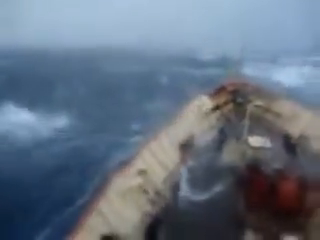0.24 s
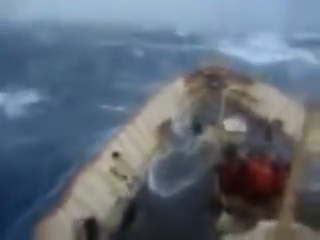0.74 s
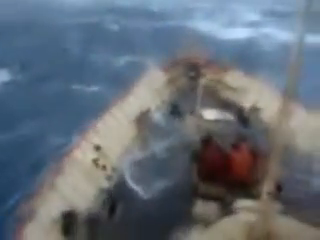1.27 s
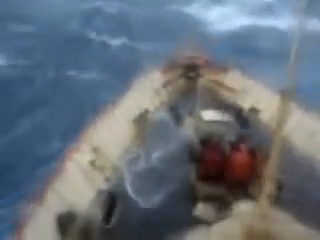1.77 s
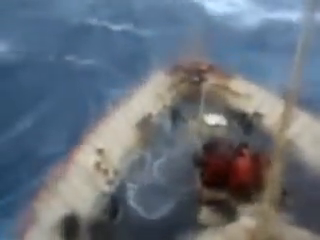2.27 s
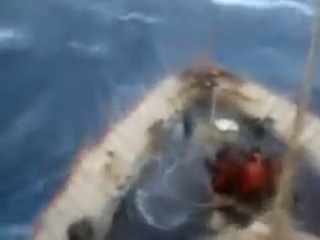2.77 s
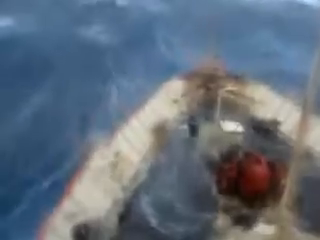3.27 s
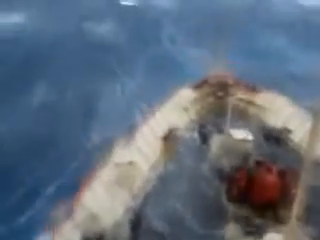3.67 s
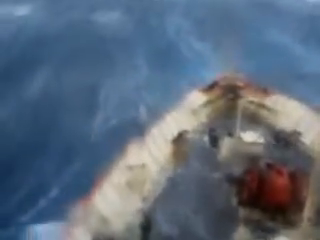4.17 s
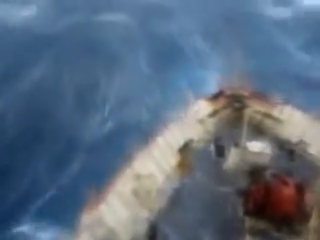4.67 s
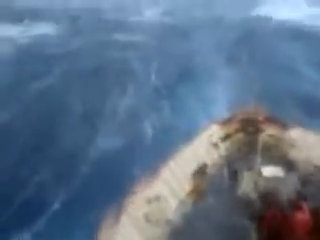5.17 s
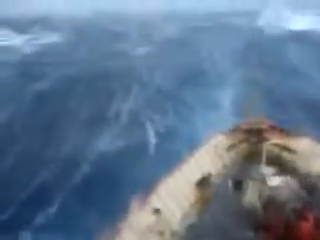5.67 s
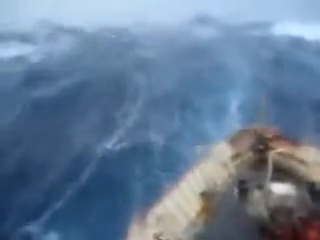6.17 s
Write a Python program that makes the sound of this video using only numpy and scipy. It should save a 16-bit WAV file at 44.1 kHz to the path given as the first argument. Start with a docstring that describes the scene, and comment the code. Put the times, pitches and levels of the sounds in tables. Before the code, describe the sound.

A deep, uneven engine throb fills a ship's bridge, with panels and light fittings buzzing in wavering tones. Outside, wind and sea rush continuously, with a faint airy whistle in gaps. Spray and sharp window drops come early, the weather softens in the middle around a swelling deck hum, then the hiss and roar rise again with isolated drops. The microphone is inside, close to the vibrating structure, in mono.

```python
"""On the bridge of a ship that pitches through a storm: two engines drone, sea and wind roar, plating buzzes.
0-1.7 s: the faster engine leads; roar and spray hiss (filtered noise) run high, drops (noise bursts through
pane resonances) smack the window, water surges over steel. 1.7-3.8 s: the faster engine sinks, the slower
comes forward, the sea ebbs, the deck hum swells at 2.63 s. From 3.8 s: faster engine, sea and spray return,
with single drops; the slower engine fades out. The engines and structure are wavering sines that beat."""
import sys
import numpy as np
from scipy import signal
from scipy.fft import rfft, irfft, next_fast_len
from scipy.io import wavfile
from scipy.ndimage import uniform_filter1d, map_coordinates

SR = 44100
rng = np.random.default_rng(int(sys.argv[2]) if len(sys.argv) > 2 else 0)


def master_out(mix):
    """Clip the mix to full scale and print it as 16-bit PCM to the path in sys.argv[1]."""
    frames = np.transpose(np.atleast_2d(mix))
    ceiling = np.clip(frames, -1, 1)
    pcm = np.round(ceiling * 32767).astype(np.int16)
    wavfile.write(sys.argv[1], SR, pcm)


N = 284004

# weather before trims: t/s, sea roar/dB, spray/dB
STORM = [(0.0, -25.5, -45.5), (0.28, -26, -36), (0.82, -25, -36), (0.92, -25.5, -37.5), (1.28, -24, -42),
         (1.56, -25.0, -38.5), (1.92, -27.5, -42.5), (2.16, -26.5, -43.5), (2.36, -29, -45.5),
         (3.16, -30, -47), (3.4, -32, -39), (4.14, -26.5, -35.5), (4.78, -26.5, -37), (5.02, -28.5, -39.5),
         (5.48, -25.5, -35.5), (6.42, -28.5, -40.5)]
# spray spectrum, relative: f/Hz, density/dB
SPRAY = [(1500, -23), (3200, -4.5), (4000, 0.5), (4500, 1.5), (5400, -3), (6500, -8), (8000, -4),
         (9500, -6), (10500, -20.5)]


def amp(db):
    """Decibels to gain."""
    return 10 ** (np.asarray(db) / 20)


def unit(x):
    """x at rms 1."""
    return x / np.sqrt(np.mean(x ** 2) + 1e-20)


def swing(db):
    """A level curve about its mean."""
    return db - db.mean()


def curves(rows):
    """One value per sample for each column after the time."""
    s, *cols = np.transpose(rows)
    return [np.interp(np.arange(N) / SR, s, c) for c in cols]


def wobble(rate):
    """A smooth random curve, rate knots a second."""
    knots = rng.standard_normal(1024)
    return map_coordinates(knots, [np.arange(N) * rate / SR], mode="mirror")


def filtered(x, response):
    """x times a response of frequency."""
    m = next_fast_len(len(x) + 8192)
    spectrum = rfft(x, m) * response(np.fft.rfftfreq(m, 1 / SR))
    return irfft(spectrum, m)[:len(x)]


def ring(hz, centre_hz, width_hz):
    """Response of one resonance."""
    return 1j * hz * width_hz / (centre_hz ** 2 - hz ** 2 + 1j * hz * width_hz)


def rush(spectrum, patchy_db):
    """Coloured noise of rms 1 with turbulent patches of random gain."""
    z = signal.stft(rng.standard_normal(N), nperseg=512)[2]
    field = uniform_filter1d(rng.standard_normal(z.shape), size=9, axis=0)  # over frequency
    field = uniform_filter1d(field, size=10, axis=1)  # over time
    noise = signal.istft(z * amp(patchy_db * unit(field)), nperseg=512)[1][:N]
    f, db = np.transpose(spectrum)
    return unit(filtered(noise, lambda hz: amp(np.interp(np.log(hz + 1), np.log(f), db))))


def tone(hz, drift_rad, rate, flutter_db):
    """A sine of rms 1; independent wobbles of rate knots/s, scaled by drift and flutter, move phase and level."""
    phase = 2 * np.pi * (hz * np.arange(N) / SR + rng.random()) + drift_rad * wobble(rate)
    return unit(np.sin(phase) * amp(flutter_db * wobble(rate)))


def engine_room():
    """Pumps and fans hum, the higher tones wavering faster, over a dull rumble that grows with the sea."""
    # steady machinery tones: f/Hz, level/dB
    machinery = [(71.6, -36.5), (80.9, -43), (92.1, -37.5), (95.5, -36.5), (131.6, -35), (166, -40.5),
                 (330, -43.5), (548, -46.5), (763, -45)]
    # hull rumble spectrum, relative: f/Hz, density/dB
    rumble_spectrum = [(20, -15), (45, -11), (62, -5), (90, -0.5), (135, 1.5), (175, -5), (230, -1.5),
                       (320, -15.5), (500, -17), (1000, -61.5)]
    base_db, db_per_sea_db = -26, 0.38
    roar_db, _ = curves(STORM)
    hum = sum(amp(db) * tone(hz, drift_rad=0.69, rate=4 + hz / 45, flutter_db=4) for hz, db in machinery)
    rumble_db = base_db + db_per_sea_db * swing(roar_db) + 0.99 * wobble(6)
    return hum + amp(rumble_db) * rush(rumble_spectrum, patchy_db=0.1)


def storm():
    """Turbulent noise: sea roar, spray hiss, wind that rises with both, and gaps whistling as resonances."""
    # sea roar spectrum, relative: f/Hz, density/dB
    roar_spectrum = [(100, -9.5), (220, 2), (380, 0.5), (460, -1), (570, -0.5), (680, -7), (950, -6),
                     (1150, -15), (1800, -26), (4000, -60.5)]
    # wind spectrum, relative: f/Hz, density/dB
    wind_spectrum = [(500, -22), (1000, 1.5), (1500, 0), (1900, -3.5), (2600, -5.5), (3300, -13.5),
                     (5000, -11.5), (10000, -21.5)]
    # gap resonances the wind sings in: f/Hz, width/Hz, relative level/dB
    gap_modes = [(2007, 24, 1.5), (2560, 58, -10), (4052, 40, -5), (4390, 110, -0.5), (7590, 64, -9)]
    roar_trim_db, spray_trim_db, gap_trim_db = 2.5, -0.5, -14
    wind_base_db, wind_db_per_sea_db, wind_db_per_spray_db = -38, 0.7, 0.27
    mist_hz, mist_lag_s = 5800, 0.087

    roar_db, spray_db = curves(STORM)
    wind_db = wind_base_db + wind_db_per_sea_db * swing(roar_db) + wind_db_per_spray_db * swing(spray_db)
    gust = wobble(22)
    roar = amp(roar_db + roar_trim_db + 0.72 * wobble(16)) * rush(roar_spectrum, patchy_db=0.75)
    wind = amp(wind_db + 0.85 * gust) * rush(wind_spectrum, patchy_db=1.2)

    # finest spray: builds up later, falls without lag
    t = np.arange(N) / SR
    lagged_db = np.interp(t - mist_lag_s, t, spray_db)
    mist_db = np.minimum(spray_db, (spray_db + lagged_db) / 2)
    hiss = rush(SPRAY, patchy_db=1.0)
    mist = filtered(hiss, lambda hz: 1 - 1 / (1 + (hz / mist_hz) ** 10))
    spray = amp(spray_db) * (hiss - mist) + amp(mist_db) * mist
    spray *= amp(spray_trim_db + 0.27 * gust)

    # gaps follow wind and spray
    gaps = np.zeros(N)
    for hz, width_hz, db in gap_modes:
        breath = filtered(rng.standard_normal(N), lambda f: ring(f, hz, width_hz))
        gaps += amp(db) * unit(breath)
    return roar + wind + spray + amp((wind_db + spray_db) / 2 + gap_trim_db) * gaps


def sluices(fizz_db=-11):
    """Short, rough surges of water over the steel foredeck: resonant noise, each with a little spray."""
    # surges: t/s, level at centre/dB
    surges = [(0.77, -32.5), (0.86, -34.5), (1.495, -33), (1.564, -35), (2.16, -41)]
    half_length_s, centre_hz, width_hz = 0.04, 1560, 440  # half length to 1/e
    t, out = np.arange(N) / SR, np.zeros(N)
    fizz = amp(fizz_db) * rush(SPRAY, patchy_db=4.5)
    for s, db in surges:
        water = unit(filtered(rng.standard_normal(N), lambda f: ring(f, centre_hz, width_hz)))
        surge = np.exp(-((t - s) / half_length_s) ** 2)
        out += amp(db + 1.5 * wobble(70)) * surge * (water + fizz)
    return out


def drops(splash_s=0.0073, width_hz=480):
    """Each drop bursts in a few milliseconds of splatter; the pane rings according to where it lands."""
    # drops on the window: t/s, level before burst envelope/dB, lower ring/Hz, upper ring/Hz, fizz/dB
    hits = [(0.126, -25.5, 3180, 5500, -8.5), (0.792, -22, 2610, 5950, -5), (0.822, -27.5, 2690, 5900, -10),
            (0.984, -30, 1900, 2670, -17), (2.126, -32.5, 2200, 2790, -15),
            (4.38, -25.5, 4300, 5040, -13.5), (5.439, -22.5, 2550, 5800, -7), (6.126, -22, 3430, 5000, -13)]
    fizz_hz, attack_s = 9460, 0.0008
    out, t = np.zeros(N + SR), np.arange(SR // 20) / SR
    burst = (1 - np.exp(-t / attack_s)) * np.exp(-(t / splash_s) ** 2)
    for s, db, low_hz, high_hz, fizz_db in hits:
        def pane(f):
            low, high = ring(f, low_hz, width_hz), ring(f, high_hz, width_hz)
            return low + amp(-4.0) * high + amp(fizz_db) * ring(f, fizz_hz, 800)
        splatter = unit(filtered(rng.standard_normal(len(t)), pane))
        out[round(s * SR):][:len(t)] += amp(db) * burst * splatter
    return out[:N]


def structure():
    """Deck, wall panels and light fittings each sing on close tones, which throb against each other."""
    # shake before trims: t/s, wall panels/dB, light fittings/dB
    shake = [(0.0, -22.5, -23.5), (0.26, -23.5, -22.5), (0.68, -24.5, -30), (0.88, -39, -39),
             (1.16, -19, -17), (1.66, -34.5, -25), (1.82, -22, -35), (1.92, -38.5, -28.5),
             (2.1, -23.0, -26), (2.22, -29.5, -19.5), (2.34, -28, -40), (3.04, -28, -36.5),
             (3.34, -34, -35), (4.12, -21, -26.5), (4.4, -35.5, -43), (4.5, -21.5, -29.5),
             (4.8, -20.5, -22.5), (5.02, -28, -29.5), (6.28, -28, -22.5), (6.42, -23, -29.5)]
    # shaft orders in the deck: f/Hz, relative level/dB
    deck_tones = [(189.9, -6), (196.7, -1), (211.7, -6)]
    # shaft orders in the wall panels: f/Hz, relative level/dB
    panel_tones = [(286.9, -3.5), (292.5, -4), (297.8, -5)]
    # light fittings: f/Hz, relative level/dB
    fitting_tones = [(343, -11), (371.5, -5), (383, -11), (399.5, -5), (404, -8.5), (413, -11.5),
                     (577, -9.5), (584, -9.5)]
    panel_trim_db, fitting_trim_db, deck_base_db = 1, -3, -29.5
    swell_s, swell_half_length_s, swell_db = 2.63, 0.28, 8  # deck swells once as the bow goes down

    panel_db, fitting_db = curves(shake)
    t = np.arange(N) / SR
    deck_db = deck_base_db + swell_db * np.exp(-((t - swell_s) / swell_half_length_s) ** 2)
    deck = sum(amp(db) * tone(hz, drift_rad=0.22, rate=5, flutter_db=2.0) for hz, db in deck_tones)
    panels = sum(amp(db) * tone(hz, drift_rad=0.19, rate=6, flutter_db=0.2) for hz, db in panel_tones)
    fittings = sum(amp(db) * tone(hz, drift_rad=0.61, rate=8, flutter_db=1.9) for hz, db in fitting_tones)
    out = amp(deck_db) * deck
    out += amp(panel_db + panel_trim_db) * panels
    return out + amp(fitting_db + fitting_trim_db) * fittings


def engines():
    """Two firing tones beat against each other as the load shifts with the swell."""
    # faster engine's firing tone before trim: t/s, level/dB
    fast_rows = [(0.0, -13), (0.92, -16.0), (1.64, -10.5), (1.82, -28.5), (2.28, -18.5), (2.52, -26),
                 (3.44, -31), (3.84, -17.5), (4.02, -26.5), (4.12, -17.5), (4.22, -34), (4.36, -18.5),
                 (5.16, -19.0), (5.26, -11), (5.46, -16.5), (5.56, -10.0), (6.32, -13), (6.42, -19.5)]
    # its second harmonic before trim: t/s, level/dB
    octave_rows = [(0, -32), (0.35, -24), (0.8, -32.5), (1.25, -23.5), (2.0, -32.5), (3.25, -42),
                   (4.1, -33), (5.6, -24.5), (5.78, -17), (6.15, -26), (6.42, -25)]
    # slower engine's firing tone: t/s, level/dB
    slow_rows = [(0.0, -19.5), (0.88, -37), (1.64, -16.5), (1.78, -23), (2.08, -15.5), (2.62, -18.5),
                 (2.76, -36), (2.86, -20), (3.24, -16), (3.42, -25.5), (3.54, -13), (3.78, -28),
                 (4.26, -24.5), (4.54, -16), (5.08, -25.5), (6.42, -37.5)]
    fast_hz, slow_hz = 119.9, 105.3
    fast_trim_db, octave_trim_db = -0.46, 0.4
    fast_db, = curves(fast_rows)
    octave_db, = curves(octave_rows)
    slow_db, = curves(slow_rows)
    fast = amp(fast_db + fast_trim_db) * tone(fast_hz, drift_rad=0.17, rate=8, flutter_db=1.86)
    octave = amp(octave_db + octave_trim_db) * tone(2 * fast_hz, drift_rad=0.18, rate=6, flutter_db=1.0)
    # the slower engine hunts a little: uneven throb
    slow = amp(slow_db) * tone(slow_hz, drift_rad=0.6, rate=7, flutter_db=1.0)
    return fast + octave + slow


def scene():
    """Everything as heard on the bridge, in one channel."""
    background = engine_room() + storm()
    water = sluices() + drops()
    return (background + water + structure() + engines())[None]


def record(dry, top_hz=10080):
    """Band limit: nothing passes at or above top_hz."""
    return np.array([filtered(x, lambda hz: hz < top_hz) for x in dry])


dry = scene()
out = record(dry)
master_out(out)
```